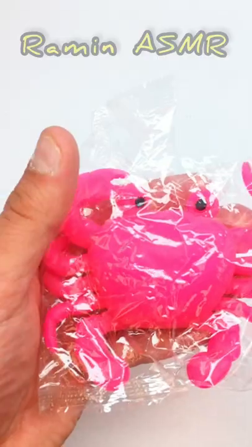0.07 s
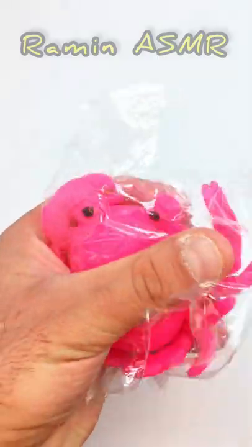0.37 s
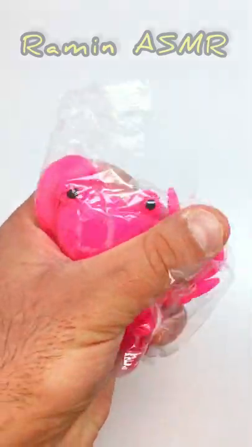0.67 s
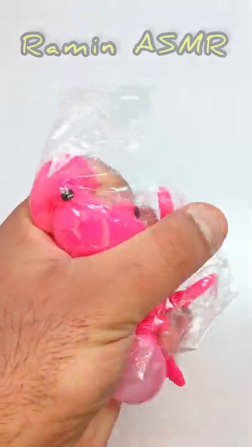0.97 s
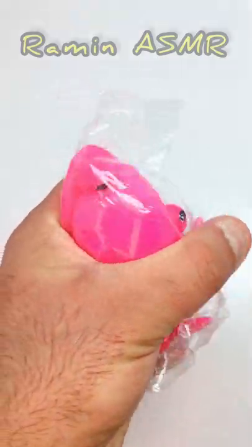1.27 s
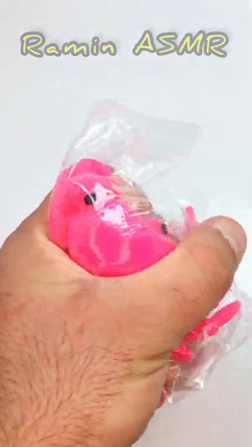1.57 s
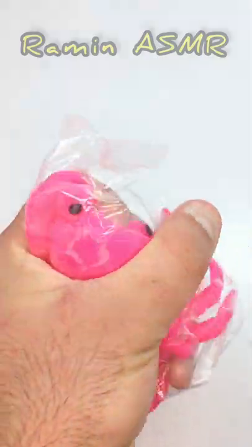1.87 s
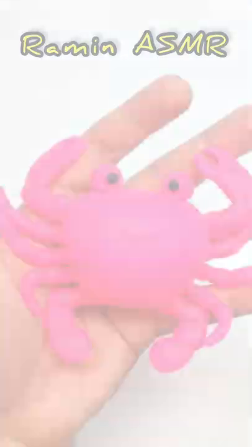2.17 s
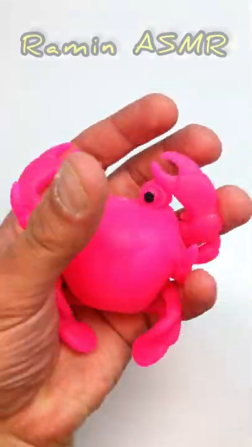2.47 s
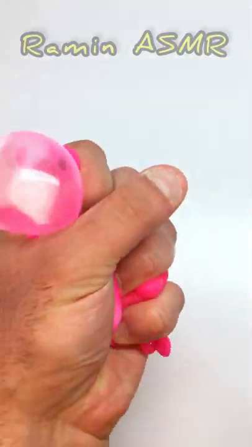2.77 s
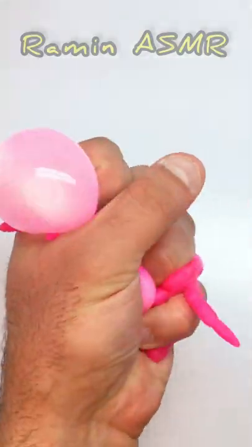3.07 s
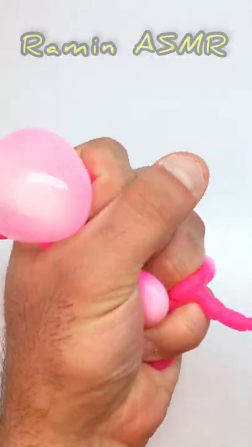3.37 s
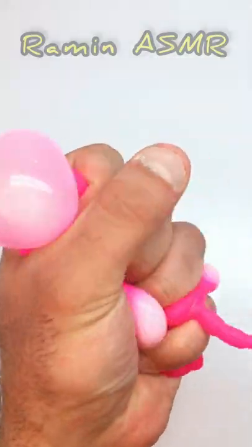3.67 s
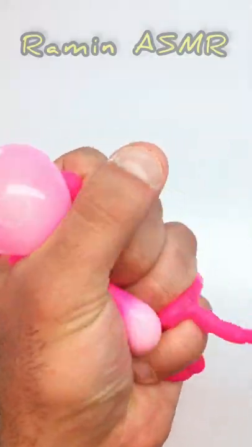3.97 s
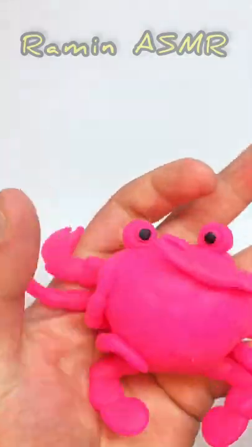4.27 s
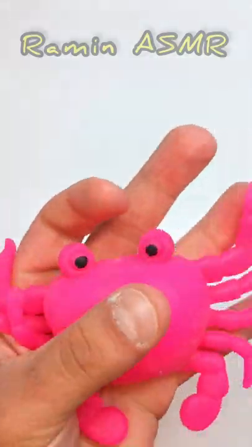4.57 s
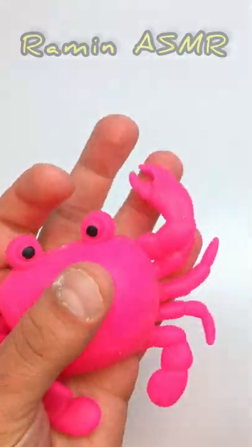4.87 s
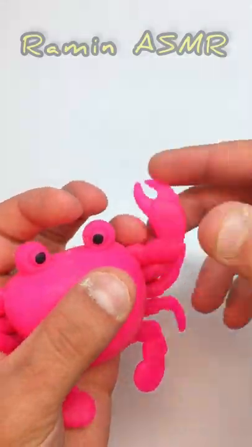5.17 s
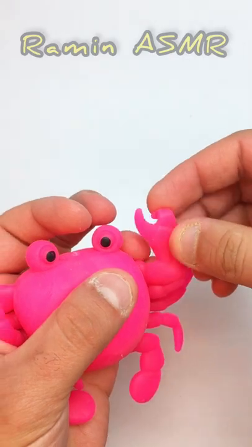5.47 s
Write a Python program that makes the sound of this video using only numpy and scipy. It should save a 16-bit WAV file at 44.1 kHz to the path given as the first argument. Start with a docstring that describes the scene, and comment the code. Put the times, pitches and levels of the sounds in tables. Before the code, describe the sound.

A hand kneads a soft rubber toy inside its thin plastic wrapper, making dense crinkling with sharp snaps from stiff creases. The crinkling fades away, and the bare toy is squeezed five times, each a wet, mouth-like pop that sucks open and squelches shut. A few small moist ticks and two very faint hisses follow. The microphone is close, in a small, quiet room.

```python
"""Wrapper and wet pops

Close to the microphone in a small, quiet room, a hand kneads a soft rubber toy in its thin plastic
wrapper: the film ticks and buckles, and stiff creases snap. That fades out, and five wet, squishy,
mouth-like pops fade in: a small cavity sucks open with a rising note, then squelches shut.
Small lip-like ticks fall around and after them, and two faint, breathy hisses follow."""
import sys
import numpy as np
from scipy import signal
from scipy.fft import rfft, irfft
from scipy.io import wavfile
from scipy.ndimage import uniform_filter1d

SR = 44100
rng = np.random.default_rng(int(sys.argv[2]) if len(sys.argv) > 2 else 0)


def wrap_up_sound(samples):
    """Save the sound to the file named by the first command line argument, as 16-bit audio."""
    columns = np.atleast_2d(samples).T
    # keep every value between -1 and 1, then stretch to whole-number steps
    tamed = np.clip(columns, -1, 1)
    steps = np.round(tamed * 32767).astype(np.int16)
    wavfile.write(sys.argv[1], SR, steps)


N = 248283
TIME = np.arange(N) / SR

# Low rumble, close up. Each row: frequency in Hz, relative level in dB.
RUMBLE_SPECTRUM = [(12, -38.5), (20, 4), (54, -2.5), (75, -14), (114, -13), (151, -14), (412, -27.5),
                   (461, -30), (900, -34.5), (1170, -62), (1980, -120)]
# The faint hiss behind everything. Each row: frequency in Hz, relative level in dB.
HISS_SPECTRUM = [(290, -38), (500, -7), (880, -6), (1090, -4), (2540, -9.5), (14900, -14.5), (16000, -16.5)]
# Strokes of the hand on the wrapper, gripping and easing in turn. Each row: start in seconds,
# length in seconds, level in dB, the film's body in dB relative to that level.
HAND_STROKES = [(0.129, 0.091, -38.5, -15), (0.209, 0.039, -28, -13.5), (0.282, 0.07, -41.5, -7.5),
                (0.382, 0.065, -20, -16.5), (0.476, 0.024, -33, -19), (0.556, 0.049, -29, -17),
                (0.64, 0.034, -30, -19.5), (0.707, 0.058, -18.5, -12), (0.845, 0.031, -21, -13.5),
                (0.914, 0.055, -27, -17), (0.982, 0.064, -21.5, -18.5), (1.126, 0.03, -17.5, -14),
                (1.228, 0.11, -21.5, -16.5), (1.395, 0.067, -21, -15), (1.525, 0.072, -23, -16),
                (1.663, 0.07, -22.5, -16), (1.781, 0.086, -24, -17.5), (1.942, .14, -29, -15)]
# The tone of the plastic film. Each row: frequency in Hz, relative level in dB.
FILM_SPECTRUM = [(47, -38), (80, -4), (422, -6), (515, -7), (839, -3.5), (1120, -10.5), (1780, -4.5),
                 (1950, -2.5), (5170, 1), (14300, -7.5), (16000, -14)]
# The film's lasting resonances. Each row: frequency in Hz, width in Hz, relative level in dB.
FILM_RESONANCES = [(434, 31, -1.5), (826, 23, -7), (2290, 27, -8.5), (2850, 24, -8.5), (5180, 100, -5)]
# The film's body, crackle and sizzle. Each row: low edge in Hz, high edge in Hz.
BODY_CRACKLE_SIZZLE = [(50, 1500), (1500, 8000), (8000, 19000)]
# The loudest creases snapping through. Each row: time in seconds, relative peak in dB, pitch in Hz,
# relative level of the patter that follows in dB.
CREASE_SNAPS = [(0.1442, -20.5, 1440, -30.5), (0.1755, -16.5, 4520, -22), (0.2193, -9.5, 9800, -20),
                (0.3408, -12, 5010, -22), (0.403, -1.5, 6210, -11), (0.4295, 1.5, 8560, -12),
                (0.4414, -5, 1860, -28), (0.5368, -23.5, 10500, -20), (0.5536, -7, 8700, -21),
                (0.5748, -4.5, 8130, -16.5), (0.598, -5.5, 5820, -16), (0.6383, -5.5, 6950, -14),
                (0.6661, -5, 10500, -15), (0.6743, -10, 14100, -10.5), (0.7656, -2.5, 7120, -15),
                (0.7817, -3.5, 3490, -15.5), (0.8562, -0.5, 6280, -13.5), (0.9102, -4, 7920, -15.5),
                (0.9294, -17, 1470, -24), (0.9735, -6, 7750, -22.5), (1.0206, -0.5, 4200, -8),
                (1.0449, -3.5, 3660, -14), (1.0987, -8.5, 7810, -22.5), (1.1182, -11, 3570, -18.5),
                (1.2017, -8.5, 4270, -18), (1.2858, 4, 7960, -12), (1.4036, -1.5, 6890, -10.5),
                (1.4785, -3.5, 5220, -21.5), (1.507, -10.5, 5040, -18.5), (1.5654, 4, 5960, -19.5),
                (1.5813, -11, 5110, -13.5), (1.6544, -4, 7010, -8.5), (1.6875, -15.5, 3420, -11.5),
                (1.7606, -16.5, 2150, -26), (1.8213, 0, 5910, -15), (1.9063, -5, 13700, -15),
                (1.9476, -3, 5140, -29)]
# The small room's decay. Each row: frequency in Hz, seconds to fall 60 dB.
ROOM_DECAY = [(200, 0.18), (1500, 0.23), (5000, 0.18), (14000, 0.27)]
# Small wet, lip-like ticks. Each row: start in seconds, relative ring level in dB,
# ring pitch in Hz, click peak in dB, click pitch in Hz.
WET_TICKS = [(2.554, -66, 1210, -38, 7240), (2.609, -46, 1250, -34, 2840),
             (2.629, -40.5, 1180, -33.5, 6000), (3.151, -49.5, 1500, -33, 6400),
             (3.221, -43, 520, -37, 6500), (3.772, -32.5, 1420, -43, 4000), (3.824, -32, 610, -27.5, 2700),
             (4.271, -42, 1680, -34.5, 2880), (4.495, -41, 870, -32.5, 1800),
             (5.259, -50.5, 852, -49, 2700)]
# Wet films bursting as the cavity opens. Each row: start in seconds, relative ring level in dB,
# click peak in dB, click pitch in Hz, decay of the crackle in seconds.
OPENING_POPS = [(2.7238, -23.5, -25.5, 3040, 0.0031), (2.7504, -16, -7.5, 5150, 0.0029),
                (2.769, -26.5, -28, 3000, .002), (3.048, -21, -21.5, 2800, 0.007),
                (3.056, -16.5, -7.5, 4600, 0.0028), (3.33, -39, -32, 6000, 0.011),
                (3.348, -26, -31, 3000, 0.0034), (3.6332, -27, -44, 2000, .002),
                (3.645, -32, -17.5, 6300, 0.0072), (3.68, -29, -41, 2500, .002),
                (3.93, -21, -23.5, 6200, .006), (3.941, -23, -20, 3000, 0.0026),
                (3.945, -41, -16, 4600, 0.0036), (3.967, -26, -32, 2500, .0015)]
# A small wet cavity sucks open. Each row: time in seconds, pressure peak in dB, rising note in dB,
# moist fizz in dB, note of the open cavity in Hz.
CAVITY_OPENINGS = [(2.714, -35, -53, -63, 1854), (3.0361, -25, -42, -55, 1632),
                   (3.3279, -24.5, -39, -58, 1700), (3.6321, -29, -43, -54, 1620),
                   (3.9302, -29, -43, -51.5, 1570)]
# Trapped air left ringing by the pops. Each row: start in seconds, level in dB, pitch in Hz,
# seconds to fall 60 dB.
AIR_BUBBLES = [(2.7505, -16, 8140, 0.0139), (2.906, -32.5, 454, 0.097), (3.049, -3, 3160, 0.0032),
               (3.0566, -11, 4300, 0.0093), (3.349, -29.5, 4970, 0.02), (3.647, -22.5, 5040, 0.027),
               (3.9412, -22, 2120, 0.019), (3.966, -28, 1880, 0.017), (4.4945, -45, 607, 0.13)]
# The cavity squelches shut. Each row: time in seconds, wobble in dB, gurgle in dB,
# moist fizz in dB, smack in dB.
CAVITY_CLOSINGS = [(2.882, -22.5, -36.5, -43.5, -24.5), (3.190, -20.5, -43, -41.5, -50),
                   (3.481, -24, -39.5, -42, -26), (3.798, -24, -40.5, -45.5, -43),
                   (4.077, -24, -42.5, -49, -44)]
# Faint, short, breathy hisses after the pops. Each row: midpoint in seconds, half length in seconds,
# level in dB, pitch in Hz.
SOFT_HISSES = [(4.446, 0.073, -58, 3510), (5.287, 0.014, -68, 2000)]

WRAPPER_IN_S, WRAPPER_OUT_S, POPS_IN_S = (.085, .16), (1.933, 2.187), (2.205, 2.695)   # fades: from, to
CUTOFF_HZ = 16000


def from_db(db):
    """Decibels to gain."""
    return 10 ** (np.asarray(db) / 20)


def unit_rms(x):
    """Scale to unit power."""
    return x / np.sqrt(np.mean(x ** 2) + 1e-20)


def evened(x):
    """Unit power over every 25 ms or so; single clicks still stand out."""
    return x / np.sqrt(np.abs(uniform_filter1d(x * x, size=1100)) + 1e-6)


def ramp(start_s, end_s):
    """Straight rise from 0 to 1."""
    return np.clip((TIME - start_s) / (end_s - start_s), 0, 1)


def at_hz(points, hz):
    """Read a table on a log-frequency axis."""
    frequencies, values = np.transpose(points)
    return np.interp(np.log(np.maximum(hz, 1)), np.log(frequencies), values)


def band(x, low_hz, high_hz, order=2):
    """Butterworth band-pass."""
    sos = signal.butter(order, [low_hz, min(high_hz, .47 * SR)], "band", fs=SR, output="sos")
    return signal.sosfilt(sos, x + 1e-18)


def colour(x, spectrum):
    """Give a sound a smooth spectrum, at unit power."""
    hz = np.arange(N + 1) * SR / (2 * N)
    return unit_rms(irfft(rfft(x, 2 * N) * from_db(at_hz(spectrum, hz)))[:N])


def ring(x, hz, t60):
    """A unit click sets a sine of height 1 ringing."""
    radius, angle = from_db(-60 / (t60 * SR)), 2 * np.pi * hz / SR
    return signal.lfilter([0, np.sin(angle)], [1, -2 * radius * np.cos(angle), radius ** 2], x + 1e-18)


def glide(hz):
    """A sine that follows a moving pitch."""
    return np.sin(2 * np.pi * np.cumsum(hz) / SR)


def grains(per_s, spread_db, size):
    """Random clicks of uneven size and sign."""
    sizes = from_db(spread_db * np.minimum(rng.exponential(1, size), 4))
    return sizes * rng.choice([-1, 1], size) * (rng.random(size) < per_s / SR)


def add(out, s, sound):
    """Mix a short sound in at s seconds."""
    i = max(round(s * SR), 0)
    out[i:i + len(sound)] += sound[:N - i]


def rumble_and_hiss(rumble_db=-50, lift_db=5, settle_s=.17, hiss_db=-66):
    """Low rumble, stronger during the five wet pops, and a faint steady hiss."""
    first, last = CAVITY_OPENINGS[0][0], CAVITY_CLOSINGS[-1][0]
    popping = ramp(first - settle_s, first) - ramp(last, last + settle_s)
    rumble = band(colour(rng.standard_normal(N), RUMBLE_SPECTRUM), 22, 1400)
    hiss = colour(rng.standard_normal(N), HISS_SPECTRUM)
    return from_db(rumble_db + lift_db * popping) * rumble + from_db(hiss_db) * hiss


def kneading(grip_s=.018, ease_s=.021, body_sag_db_per_s=50.5, sizzle_rise_db_per_s=33, pause_s=1.083):
    """Crackle, body and sizzle levels in dB: each stroke swells, holds and dies, brightening as it goes."""
    power = from_db([[-37], [-53], [-37]]) ** 2   # the film never rests while it is held
    for s, length, db, body_db in HAND_STROKES:
        flank = np.maximum(s - TIME, 0) / grip_s + np.maximum(TIME - s - length, 0) / ease_s
        stroke = from_db(db) * np.exp(-np.minimum(flank ** 1.3, 20))
        from_mid_s = np.clip(TIME - s - length / 2, -length / 2, length / 2)
        # broad folds give way first, the finest wrinkles last
        tilt_db = [np.zeros(N), body_db - body_sag_db_per_s * from_mid_s,
                   sizzle_rise_db_per_s * from_mid_s]
        power = power + (stroke * from_db(tilt_db)) ** 2
    pause_db = -11 * np.exp(-.5 * ((TIME - pause_s) / .012) ** 2)   # the hand stops for an instant
    return 10 * np.log10(power) + pause_db


def crinkle(ticks_per_s=9000, buckles_per_s=5000, ring_cycles=13, clump_db=1.78, clumps_per_s=130):
    """The film ticks more densely the harder the hand kneads; buckling facets ring for a few cycles."""
    crackle_db, body_db, sizzle_db = kneading()
    effort = from_db(.52 * (crackle_db + 25.5))   # scales both rates
    ticks = grains(ticks_per_s * effort, spread_db=4.5, size=N)
    buckles = grains(buckles_per_s * effort, spread_db=5.5, size=N)
    facet_of = rng.integers(0, 40, N)
    facets = sum(unit_rms(ring(buckles * (facet_of == k), hz, ring_cycles / hz)) * np.sqrt(hz)
                 for k, hz in enumerate(np.geomspace(1100, 16000, 40)))
    film = colour(unit_rms(ticks) + .98 * unit_rms(facets), FILM_SPECTRUM)
    film = film + sum(from_db(db) * signal.lfilter(*signal.iirpeak(hz, hz / width, fs=SR), film)
                      for hz, width, db in FILM_RESONANCES)
    levels_db = [body_db, crackle_db - 5, sizzle_db - 5]
    kneaded = sum(from_db(db) * evened(band(film, low, high, order=4))
                  for (low, high), db in zip(BODY_CRACKLE_SIZZLE, levels_db))
    # neighbouring creases give way together
    clumps = unit_rms(np.interp(TIME * clumps_per_s, np.arange(4000), rng.standard_normal(4000)))
    return kneaded * from_db(clump_db * clumps)


def small_creases(median_gap_s=1 / 12, median_hz=6500):
    """Lesser creases flip at random, louder under a harder grip; rows as in CREASE_SNAPS."""
    gap_chance, level_chance, pitch_chance = rng.standard_normal((120, 3)).T
    s = WRAPPER_IN_S[0] + np.cumsum(median_gap_s * np.exp(.5 * gap_chance))
    grip_db = np.interp(s, TIME, kneading()[0])
    peak_db = -11 + .46 * (grip_db + 25) - 1.5 * level_chance
    hz = np.minimum(median_hz * 2 ** (.5 * pitch_chance), CUTOFF_HZ)
    return np.transpose([s, peak_db, hz, peak_db - 10.5])[s < WRAPPER_OUT_S[1]]


def snaps(ring_cycles=6, patter_s=.0023, give_s=.0007):
    """A stiff crease gives, flips with a crack and a brief ring, and sets the film around it pattering."""
    out, t = np.zeros(N), TIME[:1500]
    for s, peak_db, hz, patter_db in [*CREASE_SNAPS, *small_creases()]:
        click = band(1. * (t == 0), hz / 1.5, hz * 1.5, order=1)
        snap = click + .12 * ring(click, hz, ring_cycles / hz)
        snap /= np.abs(snap).max()
        patter = unit_rms(band(rng.standard_normal(len(t)), hz / 1.5, hz * 1.5, order=1))
        patter *= np.exp(-t / patter_s) * (1 - np.exp(-t / .00017))
        add(out, s + give_s, from_db(patter_db - 1.5) * patter - from_db(peak_db - 2.5) * snap)
    return out


def room(x, build_s=.0016):
    """The small room's diffuse tail, each octave dying at its own rate."""
    t = TIME[:SR // 2]
    tail = np.zeros(len(t))
    for low_hz in 125 * 2. ** np.arange(7):
        t60 = at_hz(ROOM_DECAY, low_hz * np.sqrt(2))
        tail += band(rng.standard_normal(len(t)), low_hz, 2 * low_hz) * from_db(-60 * t / t60)
    tail *= 1 - np.exp(-t / build_s)
    return signal.fftconvolve(x, tail / np.linalg.norm(tail))[:N]


def cavity_hz(since_s, open_hz, shut_hz=746, opening_s=.0109):
    """The cavity's note rises as it widens."""
    return open_hz + (shut_hz - open_hz) * np.exp(-since_s / opening_s)


def breaking_films(smack_lead_s=.004, smack_ring_hz=935, smack_hz=1944, smack_s=.0033, tick_s=.0035):
    """Rows for pops(): bursts on opening, smacks as the walls first touch, and lip-like ticks."""
    bursts = []
    for s, ring_db, *click in OPENING_POPS:
        opened_s, *_, open_hz = min(CAVITY_OPENINGS, key=lambda opening: abs(opening[0] - s))
        bursts.append((s, ring_db, cavity_hz(abs(s - opened_s), open_hz), *click))
    smacks = [(s - smack_lead_s, db - 6.5, smack_ring_hz, db, smack_hz, smack_s)
              for s, *_, db in CAVITY_CLOSINGS]
    return bursts + smacks + [(*tick, tick_s) for tick in WET_TICKS]


def pops(ring_s=.0029, swell_s=.00079, pitch_rise=.072, band_ratio=1.336):
    """A wet film breaks with a click; the cavity behind it rings unevenly, rising as it widens."""
    out, t = np.zeros(N), TIME[:3000]
    for s, ring_db, ring_hz, click_db, click_hz, crackle_s in breaking_films():
        pitch = ring_hz * (1 + pitch_rise * (1 - np.exp(-t / .01)))
        flutter = 1 + .39 * unit_rms(band(rng.standard_normal(len(t)), 87, 1100))
        cavity = flutter * glide(pitch) * np.exp(-t / ring_s) * (1 - np.exp(-t / swell_s))
        crack = (t == 0) + .22 * rng.standard_normal(len(t)) * np.exp(-t / crackle_s)
        click = band(crack, click_hz / band_ratio, click_hz * band_ratio, order=1)
        click = band(click, 240, 12500, order=1)
        add(out, s, from_db(ring_db + 2.5) * cavity + from_db(click_db) * click / np.abs(click).max())
    return out


def fizzes(lead_s=.029, lag_s=.0094, half_s=.014, opening_hz=13000, closing_hz=7140, band_ratio=4.7):
    """A moist fizz of tiny ticks before each opening and after each closing; later, breathy hisses."""
    out, t = np.zeros(N), TIME[:SR // 2] - .25
    openings = [(s - lead_s, half_s, db, opening_hz) for s, _, _, db, _ in CAVITY_OPENINGS]
    closings = [(s + lag_s, half_s, db, closing_hz) for s, _, _, db, _ in CAVITY_CLOSINGS]
    for s, half_length, db, hz in openings + closings + SOFT_HISSES:
        ticks = grains(per_s=5000, spread_db=-1.5, size=len(t))
        fizz = unit_rms(band(ticks, hz / band_ratio, hz * band_ratio, order=1))
        add(out, s + t[0], from_db(db) * fizz * np.exp(-.5 * (t / half_length) ** 2))
    return out


def sucks(build_s=.0039, flip_s=.00085, relax_s=.0042, note_peak_s=.01):
    """Pressure sinks as the cavity is pulled open, then flips as air rushes in and its note glides up."""
    out, t = np.zeros(N), TIME[:5000] - .04
    since = np.maximum(t, 0)
    for s, peak_db, note_db, _, open_hz in CAVITY_OPENINGS:
        pulse = np.tanh(t / flip_s) / (np.exp(-t / build_s) + np.exp(t / relax_s))
        flutter = unit_rms(band(rng.standard_normal(len(t)), 9.3, 300))
        swell = since / note_peak_s * np.exp(1 - since / note_peak_s)
        note = flutter * swell * glide(cavity_hz(since, open_hz))
        add(out, s + t[0], from_db(peak_db) * pulse / np.abs(pulse).max() + from_db(note_db) * note)
    return out


def bubbles(swell_s=.00041):
    """Each bubble of trapped air rings as one quickly dying tone."""
    out, t = np.zeros(N), TIME[:4000]
    for s, db, hz, t60 in AIR_BUBBLES:
        envelope = from_db(db - 60 * t / t60) * (1 - np.exp(-t / swell_s))
        add(out, s, envelope * np.sin(2 * np.pi * hz * t))
    return out


def squelches(wobble_hz=100, wobble_s=.0053, slosh_db=-8, slosh_s=.024,
              open_hz=1550, shut_hz=400, closing_s=.00471, gurgle_s=.018, blip_s=.0013):
    """The closing cavity's note falls in little blips; the soft walls slap together and wobble."""
    out, t = np.zeros(N), TIME[:9000] - .04
    since = np.maximum(t, 0)
    pitch = shut_hz + (open_hz - shut_hz) / (1 + np.exp((t + .00224) / closing_s))
    wobble = -np.sin(2 * np.pi * wobble_hz * since) * np.exp(-since / wobble_s)
    for s, wobble_db, gurgle_db, *_ in CAVITY_CLOSINGS:
        slosh = unit_rms(band(rng.standard_normal(len(t)), 37, 230))
        slosh *= np.exp(-since / slosh_s) * (1 - np.exp(-since / .0096))
        walls = wobble + from_db(slosh_db) * slosh
        onsets = grains(per_s=450, spread_db=5.5, size=len(t))
        blips = unit_rms(signal.lfilter([1], [1, -np.exp(-1 / (blip_s * SR))], onsets))
        gurgle = blips * glide(pitch) * np.exp(-.5 * ((t - .012) / gurgle_s) ** 2)
        add(out, s + t[0], from_db(wobble_db) * walls + from_db(gurgle_db) * gurgle)
    return out


def scene(wrapper_room_db=-17.5, pops_room_db=-12.5):
    """One close microphone, a little room behind: the wrapper fades in and out, then the pops fade in."""
    wrapper = (crinkle() + snaps()) * (TIME < WRAPPER_OUT_S[1])
    wet_pops = pops() + bubbles() + sucks() + squelches() + fizzes()
    reverb = room(from_db(wrapper_room_db) * wrapper + from_db(pops_room_db) * wet_pops)
    fader = np.maximum(ramp(*WRAPPER_IN_S) - ramp(*WRAPPER_OUT_S) + ramp(*POPS_IN_S), .002)
    return (fader * (wrapper + wet_pops + reverb + rumble_and_hiss()))[None]


def record(dry, overload_peak=.75):
    """The recorder rounds off the sharpest snaps and cuts the top steeply."""
    rounded = dry / (1 + (dry / overload_peak) ** 6) ** (1 / 6)
    return signal.sosfilt(signal.ellip(10, .1, 80, CUTOFF_HZ, fs=SR, output="sos"), rounded)


dry = scene()
out = record(dry)
wrap_up_sound(out)
```